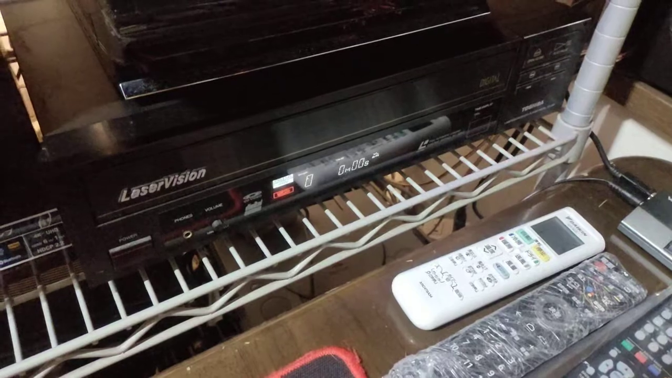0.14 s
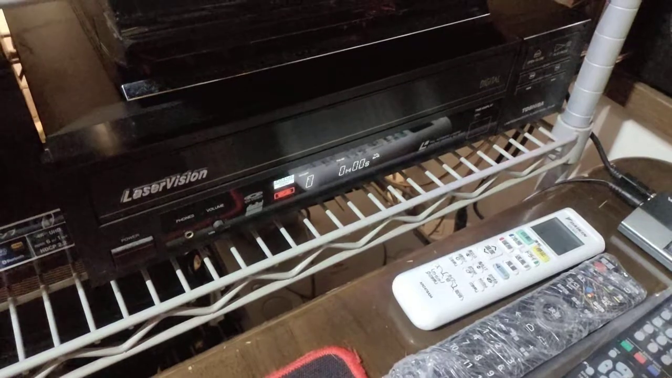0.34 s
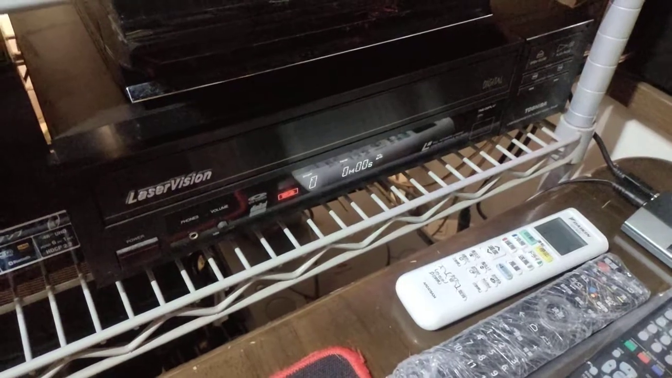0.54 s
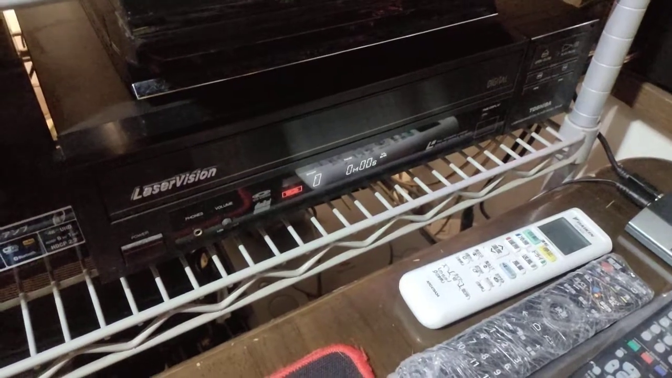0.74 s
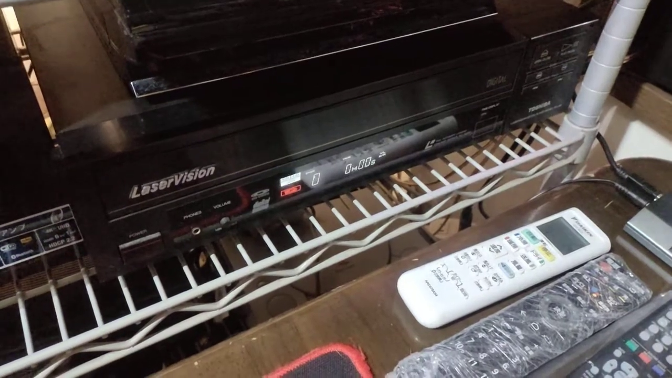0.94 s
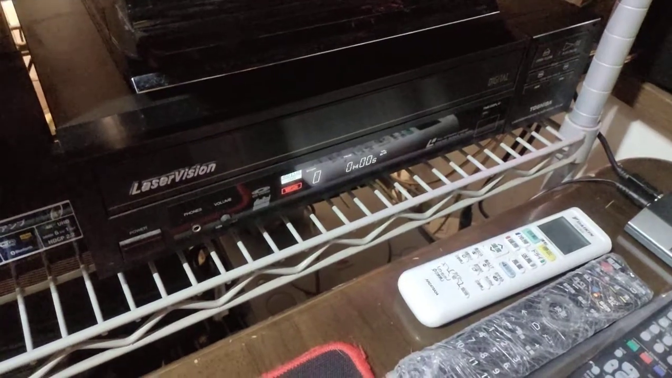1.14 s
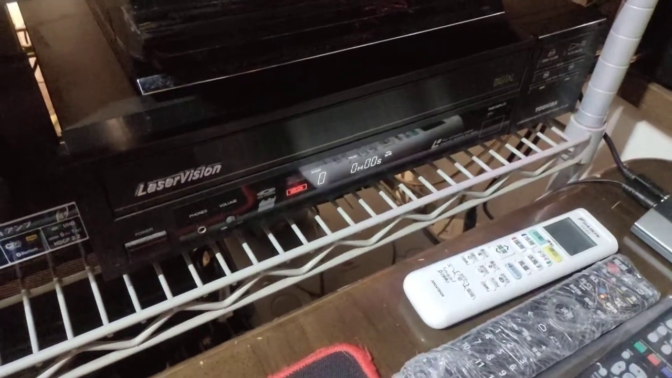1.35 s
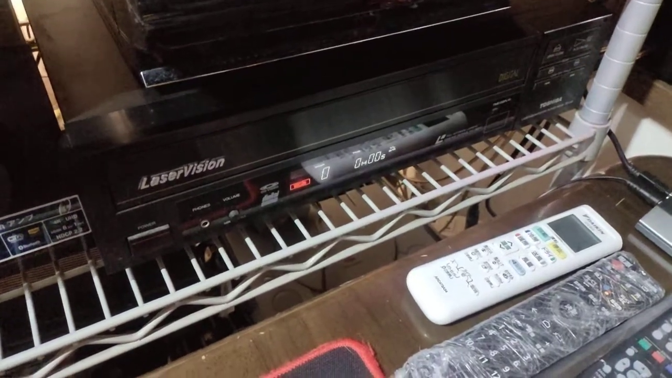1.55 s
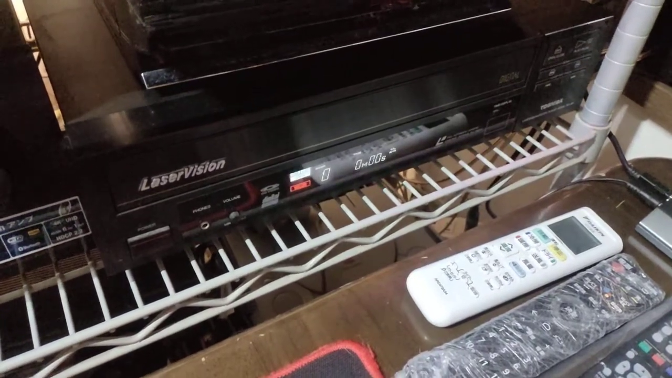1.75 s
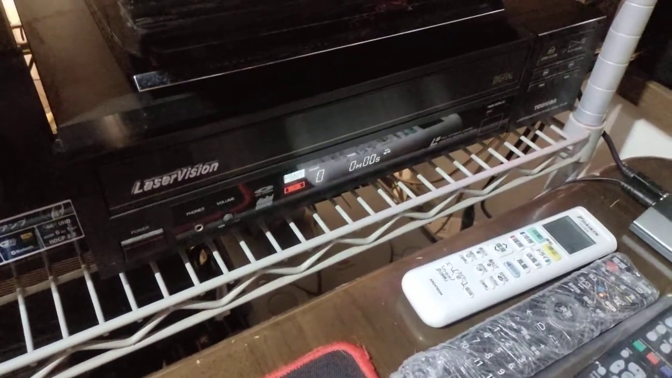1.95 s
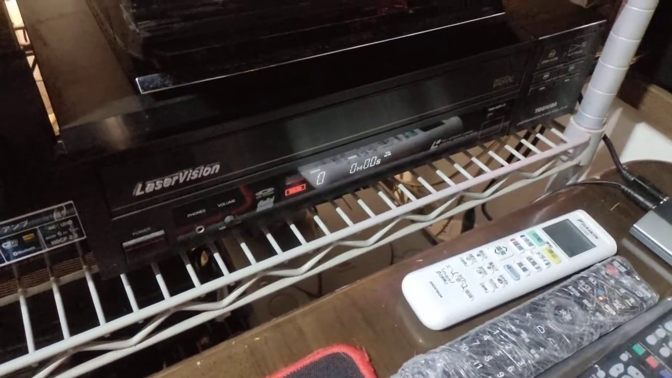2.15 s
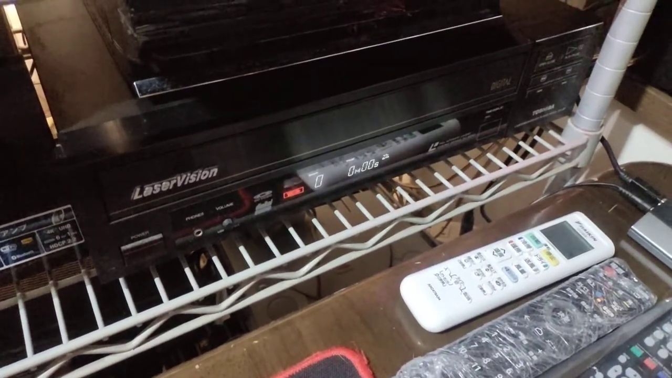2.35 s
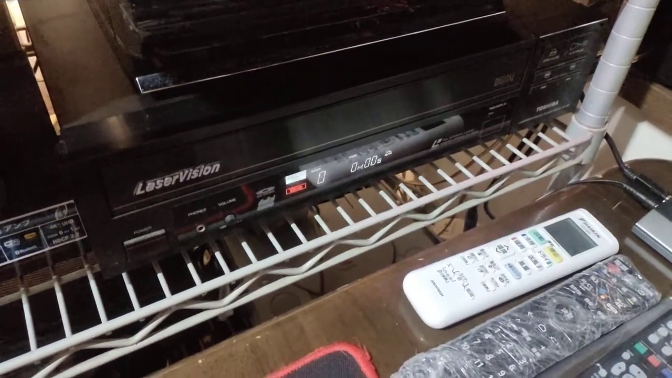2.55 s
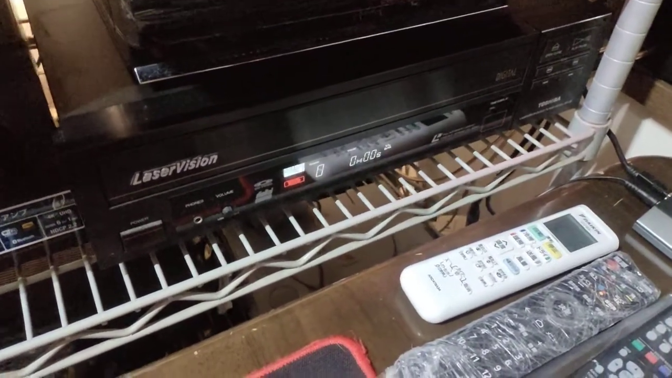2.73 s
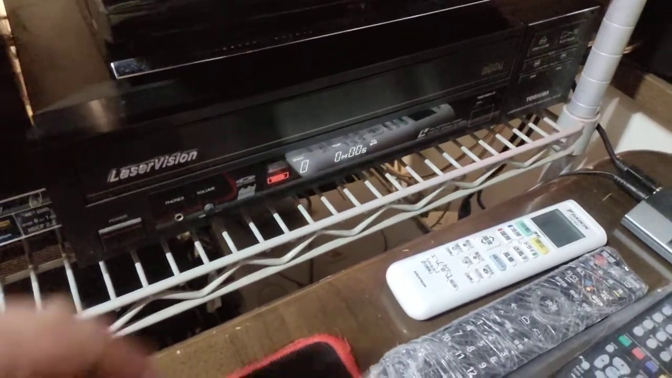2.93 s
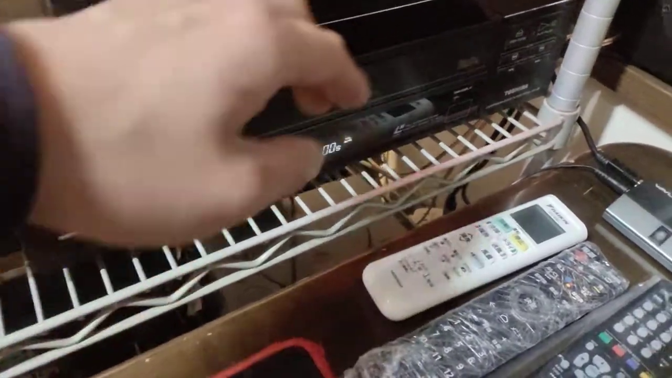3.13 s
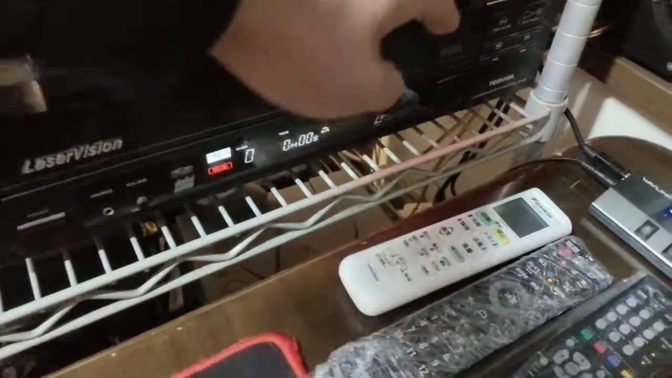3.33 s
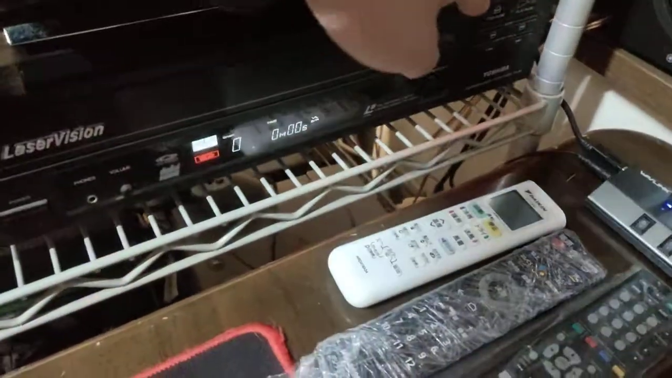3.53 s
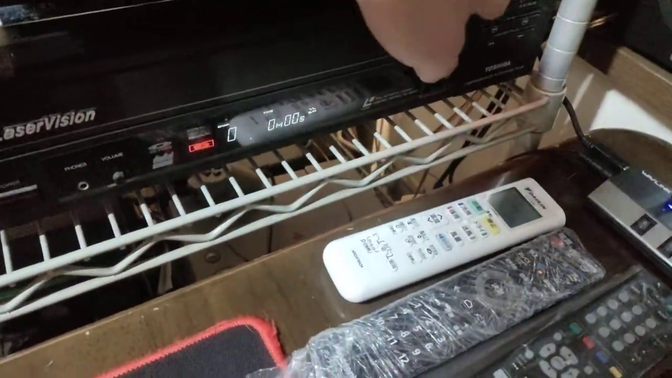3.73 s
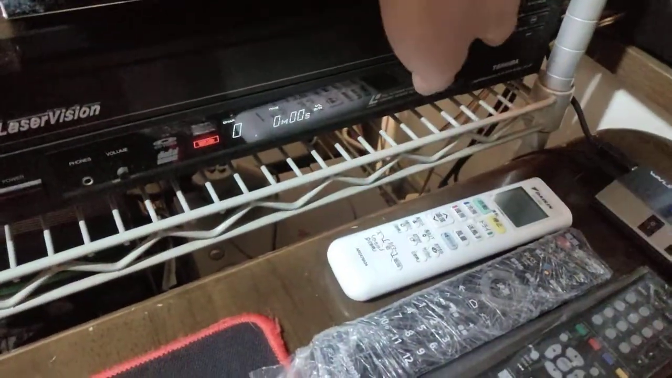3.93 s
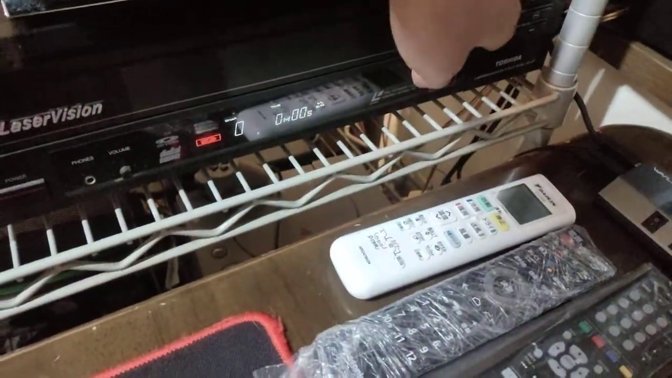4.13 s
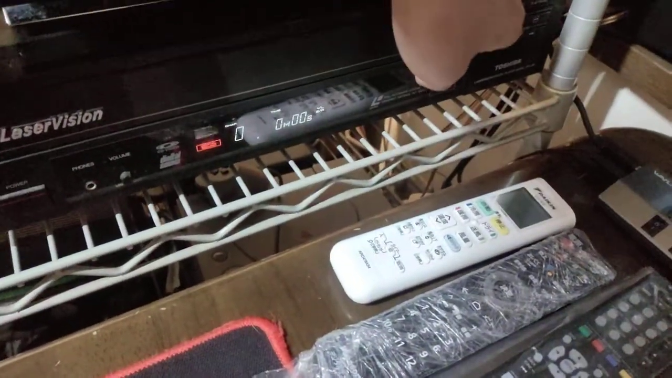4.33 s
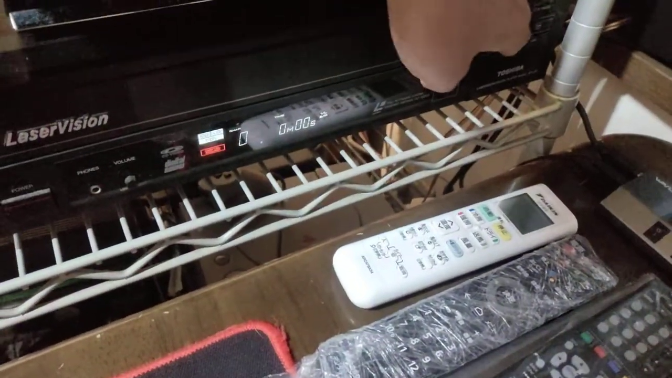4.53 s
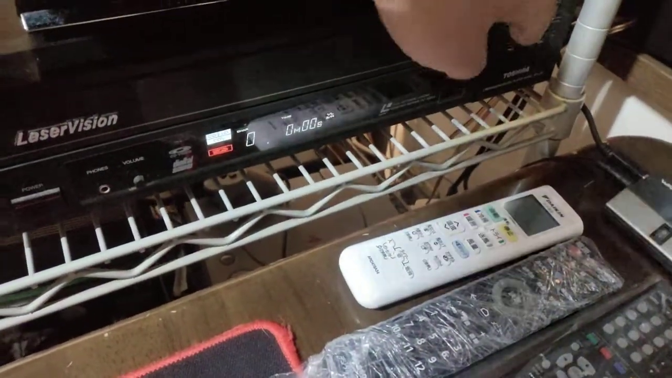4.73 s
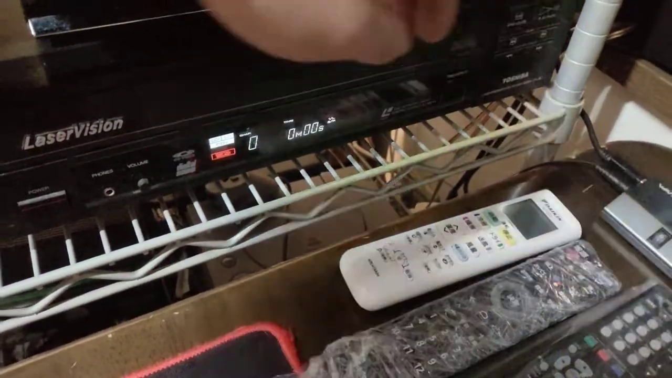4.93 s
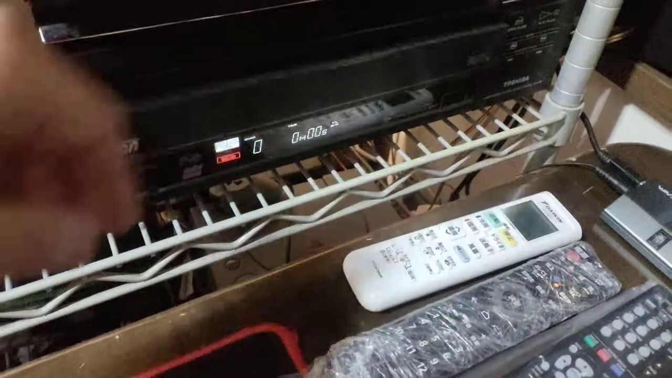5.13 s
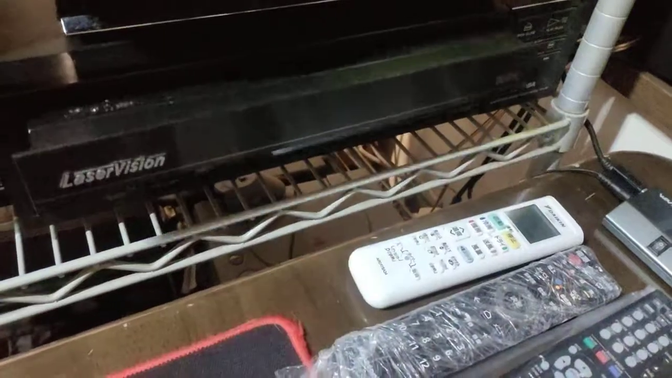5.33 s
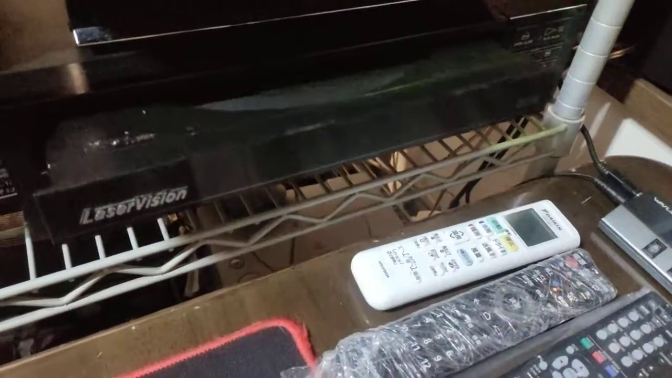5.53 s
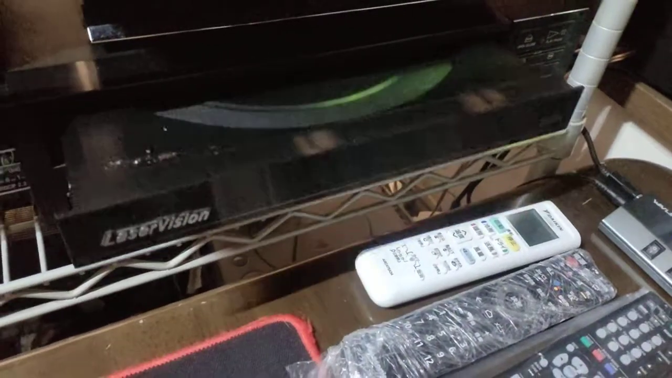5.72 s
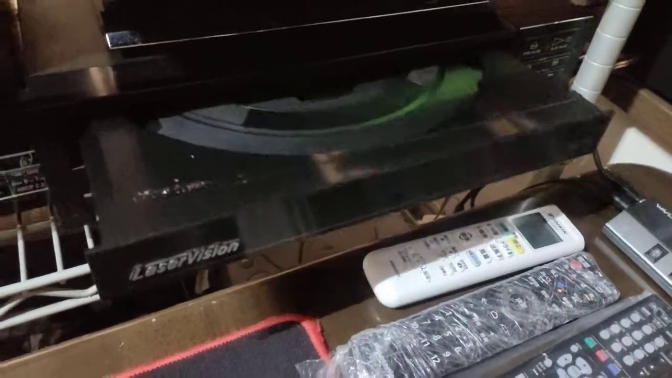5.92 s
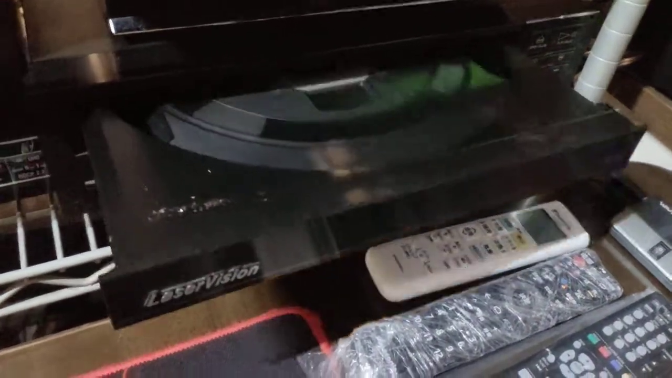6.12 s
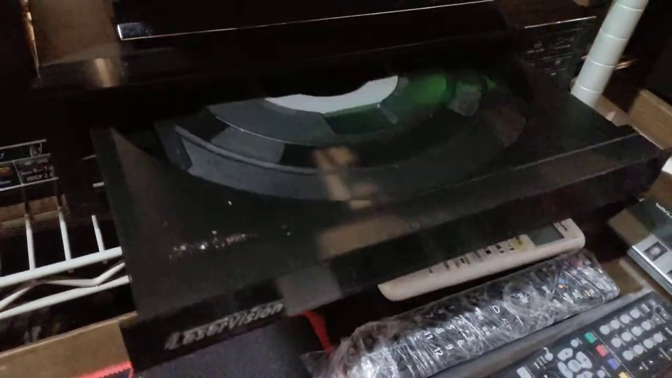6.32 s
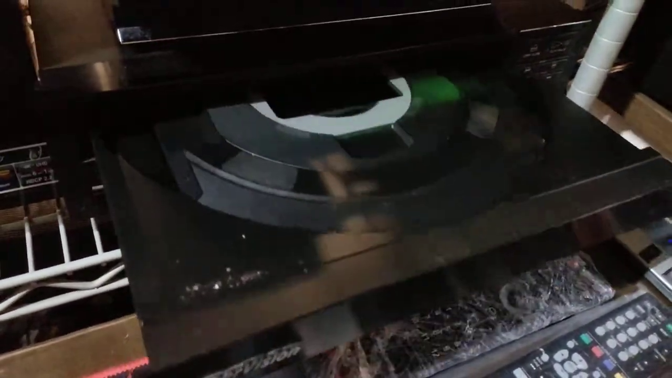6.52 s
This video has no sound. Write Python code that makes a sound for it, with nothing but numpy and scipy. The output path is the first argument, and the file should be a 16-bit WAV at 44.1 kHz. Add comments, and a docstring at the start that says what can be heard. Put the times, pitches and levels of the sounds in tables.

```python
"""A small motor whines, cams clatter twice, a finger clicks a button, the cams run again and a geared tray whirs out.
It is a disc player on a wire shelf in a quiet room; a sleeve rustles, the treble hisses and a low hum wavers.
Cams and latches excite chassis resonances by drag and impact; the motor is a sum of commutator orders.
Gear teeth grind into the tray's resonances; rustle and room tone are coloured noise at two listening ports."""
import sys
import numpy as np
from scipy import signal
from scipy.fft import rfft, irfft, next_fast_len
from scipy.io import wavfile

SR = 44100
rng = np.random.default_rng(int(sys.argv[2]) if len(sys.argv) > 2 else 0)


def wav_out(sig):
    """Save sig, one row per channel (or a flat mono array), as 16-bit PCM at SR to the path in sys.argv[1]."""
    wavfile.write(sys.argv[1], SR, np.round(np.clip(np.atleast_2d(sig).T, -1, 1) * 32767).astype(np.int16))


N = 289737  # samples
FAST = next_fast_len(N)  # transform length

# tray drive, relative levels: start_s, whir_db, gear_whine_db
TRAY_DRIVE = [(5.15, -61, -62), (5.2, -57.5, -62), (5.36, -53, -60), (5.52, -52, -57), (5.71, -52, -55.5),
              (5.85, -49.5, -57.5), (6.07, -52, -54), (6.52, -51.5, -55.5), (6.57, -52.5, -59.5)]


def mechanism():
    """Forced and struck vibration: drag and blows shake one chassis by register; struck parts ring in their modes."""
    # cam runs, and the finger on the front panel, dragging through the chassis; times sorted before use:
    # start_s, full_s, ease_s, over_s, rattle_db, case_boom_db, metal_sizzle_db (relative)
    drags = [(1.13, 1.206, 1.254, 1.27, -44.5, -45.5, -60), (1.253, 1.286, 1.397, 1.577, -44.5, -42.5, -55),
             (1.688, 1.91, 1.9, 1.88, -53, -58, -68.5), (1.887, 1.94, 2.082, 2.13, -44.5, -46, -59),
             (4.13, 4.17, 4.26, 4.23, -65, -62, -81), (4.265, 4.303, 4.305, 4.38, -55.5, -56, -69),
             (4.538, 4.578, 4.822, 4.985, -46.5, -47.5, -60), (4.846, 4.96, 5.1, 5.156, -49.5, -49, -64),
             (5.103, 5.153, 5.28, 5.33, -54, -51, -68)]
    # cams, latches and the panel striking, relative levels:
    # start_s, clack_db, boom_db, sizzle_db, snap_db, struck_note_hz, note_db, ring_t60_s
    blows = [(0.938, -49, -68, -74, -80, 2080, -54, 0.049), (1.163, -34, -59, -60, -70, 1067, -31.5, 0.044),
             (1.213, -31.5, -50, -42.5, -62, 1970, -39, 0.066),
             (1.226, -41, -56, -43, -60, 559, -28, 0.062), (1.287, -38, -46, -64, -70, 628, -28, .055),
             (1.299, -43, -50, -53, -65, 665, -27, 0.077), (1.323, -31, -57, -41, -60, 1051, -17, 0.056),
             (1.345, -42, -32.5, -38.5, -57, 660, -46, 0.054),
             (1.375, -29.5, -41, -40, -46, 686, -41, 0.094), (1.407, -29, -45, -42.5, -64, 622, -27, 0.084),
             (1.428, -30, -42, -53, -66, 574, -25, 0.074), (1.733, -50, -61, -67, -75, 590.4, -31, 0.042),
             (1.777, -45, -56, -61, -70, 1070, -43, 0.037), (1.863, -49, -67, -68, -68, 985, -46, .045),
             (1.91, -31.5, -53, -41, -62, 603, -34, 0.047), (1.93, -48, -33.5, -56, -62, 552, -36, 0.056),
             (1.942, -28.5, -32, -37, -47, 584, -26, 0.07), (1.961, -39, -38, -49, -64, 586, -33, 0.056),
             (1.988, -33.5, -52, -42, -62, 765, -20.5, 0.056), (2.053, -49, -62, -66, -67, 537, -50, 0.035),
             (2.13, -47, -53, -77, -76, 655, -43.5, 0.17), (4.168, -67, -55.5, -78, -84, 650, -62, 0.037),
             (4.302, -58, -52.5, -72, -80, 690, -56, .05), (4.557, -52, -55, -79, -75, 683, -52, .045),
             (4.59, -36, -46, -51, -70, 680, -48, 0.069), (4.62, -38, -58, -43, -68, 1130, -40, 0.081),
             (4.681, -39, -51, -66, -72, 688, -38, 0.09), (4.72, -34, -44, -45, -50, 1090, -26.5, 0.075),
             (4.738, -40, -29, -39.5, -48, 640, -44, 0.062), (4.78, -30.5, -42, -42, -45, 672, -42, 0.072),
             (4.802, -26, -44, -44.5, -62, 743, -26, 0.062),
             (4.818, -34.5, -40.5, -49.5, -68, 790, -38, 0.13), (5.038, -39, -45, -45, -52, 537, -45, .025),
             (5.054, -21.5, -39, -29.5, -32, 634, -46, 0.061),
             (5.084, -26.5, -36, -35, -49, 620, -36, 0.061), (5.11, -43, -46, -50.5, -60, 555, -42, 0.081)]
    # chassis response: frequency_hz, density_db (per Hz)
    chassis = [(24, -54), (40, -46), (133, -10), (274, -4), (352, -8.5), (783, -1.5), (909, -11.5),
               (1110, -5), (1390, -5), (2130, -1.5), (3780, -18.5), (6390, -39.5), (9770, -36),
               (14600, -22.5), (15700, -29)]
    # chassis resonances: frequency_hz, width_hz, lift_db
    chassis_modes = [(171, 40, 2.5), (269.5, 19.5, 9.5), (541, 26, 5), (780, 25, -12.5), (1110, 60, 4),
                     (2101, 70, 7), (3140, 170, 5), (6630, 1400, 13)]
    # share of the drag in each register, low to high: level_db
    drag_db = [-4.5, -5.5, -10, -0.5, -12.5]
    # chatter of a blow in each register, against its boom, clack, sizzle or snap: level_db
    chatter_db = [-13.0, -15, -13, -12, 2]
    # first impact above the chatter in each register: level_db
    impact_db = [36.0, 22.3, 17, 27.2, 13.6]
    # ring time of each register: multiple of the blow's t60
    lasting = [3, 2.56, 1.85, 1.016, 0.27]
    metal_rings_hz, ring_db, ring_width_hz = [4140, 5130, 5950, 6340, 6780], 5, 356
    note_lift_db, note_width_hz, note_impact_db = 15.5, 24, 15.5  # the impact is above the part's chatter
    blow_rise_s = 0.002
    rebound_s, rebound_db = 0.00963, -2.5  # the case thuds again as it settles on the shelf
    registers_hz = [(30, 357), (450, 1677), (1500, 3340), (4000, 8440), (9000, 17000)]

    t = np.arange(SR // 5) / SR
    notes, strikes = np.zeros((2, N)), np.zeros((5, N))
    drag = np.zeros((5, N))
    for *times, rattle, boom, sizzle in drags:
        drag += from_db([[boom], [rattle], [rattle], [sizzle], [sizzle]]) * stroke(times)
    unsteady_db = [3.5 * drift(26) for register in registers_hz]
    force = drag * from_db(np.array(drag_db)[:, None] + unsteady_db)
    contacts = grit(4000, 2.16)
    # each blow wakes the metal rings unevenly
    uneven_db = 5.2 * rng.standard_normal((len(blows), len(metal_rings_hz)))
    for blow, rings_db in zip(blows, uneven_db):
        start_s, clack_db, boom_db, sizzle_db, snap_db, note_hz, note_db, t60_s = blow
        first = round(start_s * SR)
        span = slice(first, first + len(t))
        strength = from_db(np.add([boom_db, clack_db, clack_db, sizzle_db, snap_db], chatter_db))
        # one clean impact, then chatter that rises quickly and dies away
        strikes[:, first] = strength * from_db(impact_db)
        strikes[0, first + round(rebound_s * SR)] += strikes[0, first] * from_db(rebound_db)
        # low registers last longer
        ring_s = max(t60_s, .005) * np.array(lasting)[:, None]
        fade = from_db(-60 * t / ring_s) * (1 - np.exp(-t / blow_rise_s))
        force[:, span] += strength[:, None] * fade
        chatter = contacts[:, span] * fade[3]
        chatter[0, 0] = from_db(note_impact_db)
        notes[:, span] += from_db(note_db + note_lift_db) * resonate(chatter, note_hz, note_width_hz)
        for hz, db in zip(metal_rings_hz, rings_db):
            notes[:, span] += from_db(sizzle_db + ring_db + db) * resonate(chatter, hz, ring_width_hz)

    # each register is scaled by the chassis's own response there
    unit = colour(rng.standard_normal((1, SR)), chassis, chassis_modes)
    drive = 0
    for push, strike, (low, high) in zip(force, strikes, registers_hz):
        narrowed = band(band(push * contacts + strike, low, high), low * 0.73, high * 1.25)
        drive = drive + narrowed / np.std(band(unit, low, high))
    return notes + colour(drive, chassis, chassis_modes)


def tray():
    """Friction-driven resonance: gear teeth grind into modes that wax and wane; tight spots swell the whir."""
    # broad spectrum of the teeth: frequency_hz, density_db (per Hz)
    tray_colour = [(35, -46), (60, -17), (277, -3), (449, -2.5), (655, 12.5), (825, 3), (935, -1),
                   (1720, -6), (3030, -14.5), (3970, -18), (9000, -45), (11700, -56), (19800, -120)]
    # tray resonances: frequency_hz, width_hz, lift_db
    tray_modes = [(290, 15.5, 4.5), (632, 63, -8.5), (664, 18, -13), (942, 9.7, 10.5), (1120, 20, 3.5),
                  (1246, 17, 5.5), (1500, 40, 5), (1580, 27, 11), (1844, 32, 4.5), (2230, 28, 6.5),
                  (3004, 310, 10.5), (3230, 110, -7), (3430, 60, 8), (4300, 210, 5)]
    # tight spots of the rack passing the pinion: centre_s, level_db
    bumps = [(5.288, -56), (5.395, -48), (5.493, -47.5), (5.54, -56), (5.588, -50), (5.684, -56),
             (6.047, -55), (6.099, -58.5), (6.21, -47), (6.308, -50.5)]
    bump_s = 0.0057  # Gaussian width
    drone_db, whir_lift_db, whine_lift_db = -4.5, 2, 5.5  # against the drive

    whir_db, whine_db = in_time(TRAY_DRIVE)
    t = np.arange(N) / SR
    swell = sum(from_db(db) * np.exp(-.5 * ((t - s) / bump_s) ** 2) for s, db in bumps)
    teeth = colour(grit(2500, 1.8), tray_colour)
    grind = teeth.copy()
    for hz, width, lift_db in tray_modes:
        waxing_db = 4.1 * drift(5.9) * min(1, 40 / width)  # broad modes vary less
        grind += from_db(lift_db + waxing_db) * resonate(teeth, hz, width)
    whir_gain = from_db(whir_db + whir_lift_db + 1.3 * drift(51)) + swell
    whir = whir_gain * rms_one(band(grind, 905, 8200))
    drone = from_db(whir_db + drone_db + 0.78 * drift(6.7)) * rms_one(band(grind, 85, 318))
    whine = from_db(whine_db + whine_lift_db) * rms_one(band(grind, 467, 800))
    return drone + whine + whir


def gear_tones():
    """Gear-mesh tones: thin sines, each wavering in pitch and waxing on its own as the tray travels."""
    # mesh tones: pitch_hz, level_db (against the whir, at the tray's start), climb_db_per_s
    mesh = [(656, -17.5, 5), (961, -16, 3.0), (1130, -12.5, -1), (1490, -1, -2)]
    wax_db, wax_rate_hz = 3.5, 3.1

    travelled_s = np.arange(N) / SR - TRAY_DRIVE[0][0]
    tones = 0
    for hz, db, climb_db_per_s in mesh:
        gain = from_db(db + climb_db_per_s * travelled_s + wax_db * drift(wax_rate_hz))
        wavering_hz = hz * (1 + 0.00401 * drift(9.98))
        tones = tones + gain * np.sin(2 * np.pi * np.cumsum(wavering_hz) / SR)
    return from_db(in_time(TRAY_DRIVE)[0]) * tones * [[1], [0]]


def button():
    """Modal impact: each snap rings switch body, cap, spring and panel, every mode struck anew."""
    # button snaps, relative levels: start_s, switch_db, cap_db, spring_db, panel_thud_db
    snaps = [(3.85, -58, -85, -60, -64), (3.942, -59, -63, -64, -64), (4.1268, -35.5, -50, -45, -67),
             (4.272, -65, -70, -63, -58), (4.2955, -46, -47, -61, -61)]
    # modes of each part: frequency_hz, level_db, t60_s
    switch_modes = [(2920, 2.5, 0.015), (3360, -5, 0.01), (4100, -7, .006)]
    cap_modes = [(1820, 10.5, 0.018), (2210, 10, 0.0082)]
    spring_modes = [(4930, 2.5, 0.0055), (5300, -3, 0.0055), (6460, 3, 0.0059), (7530, 6.5, 0.0066),
                    (9400, -17, .003), (13000, -6, .003)]
    panel_modes = [(272, -7, 0.053), (667, 6, 0.11), (1100, -15, .03)]

    rows, out = np.array(snaps), np.zeros((2, N))
    at = np.round(rows[:, 0] * SR).astype(int)
    for column, modes in enumerate([switch_modes, cap_modes, spring_modes, panel_modes], 1):
        for hz, db, t60_s in modes:
            clicks = np.full((2, N), 1e-18)
            # the contact bounces: delay in samples, level in dB
            for after, bounce_db in (0, 0), (55, 0.5), (130, -2.0):
                signs = rng.choice([-1, 1], (len(at), 2)).T
                clicks[:, at + after] = from_db(rows[:, column] + db - 7.5 + bounce_db) * signs
            r, w = from_db(-60 / (t60_s * SR)), 2 * np.pi * hz / SR
            out += signal.lfilter([0, np.sin(w)], [1, -2 * r * np.cos(w), r * r], clicks)
    return out


def motor():
    """Commutator harmonics on a slightly wavering speed, over resonant brush noise."""
    # commutator orders: multiple, level_db (relative)
    orders = [(1, -8), (2, -0.5), (5, -33.5), (8, -26)]
    # brush resonances: frequency_hz, width_hz, lift_db
    brush_modes = [(646, 144, 15.5), (1180, 290, 9), (2360, 420, 12.5), (6400, 540, 8.5)]
    # brush spectrum: frequency_hz, density_db (per Hz)
    brush_colour = [(100, -13), (500, 0.5), (3000, -12), (9000, -19.5)]
    # commutator pitch; after switch-off it sags and fades
    running_hz, off_s, sag_hz_per_s, coast_db_per_s = 296.4, .935, 55, 124
    tone_db, brush_db, brush_coast_db_per_s = -64, -66.5, 220
    # upper tones fade as it runs
    fourth_db, fourth_fade_db_per_s = -65.5, 20
    sideband_order, sideband_db, sideband_fade_db_per_s = 3.84, -71, 8

    t = np.arange(N) / SR
    coasting_s = np.maximum(t - off_s, 0)
    pitch_hz = running_hz - sag_hz_per_s * np.minimum(coasting_s, 1)
    phase = 2 * np.pi * np.cumsum(pitch_hz * (1 + 0.0014 * drift(6.4))) / SR
    tone = sum(from_db(tone_db + db + 1.0 * drift(5.3)) * np.sin(k * phase) for k, db in orders)
    brushes = rms_one(colour(rng.standard_normal((2, N)), brush_colour, brush_modes))
    fourth = from_db(fourth_db - fourth_fade_db_per_s * t) * np.sin(4 * phase)
    sideband = from_db(sideband_db - sideband_fade_db_per_s * t) * np.sin(sideband_order * phase)
    tones = from_db(-coast_db_per_s * coasting_s) * (tone + fourth + sideband) * [[1], [0]]
    return tones + from_db(brush_db - brush_coast_db_per_s * coasting_s) * brushes


def rustle():
    """Friction noise: dense fine contacts hiss, unrelated at the two ports."""
    # cloth and sliding hiss; times sorted before use:
    # start_s, full_s, ease_s, over_s, level_db, left_right_db
    rubs = [(2.94, 3.217, 3.1, 5.5, -65.5, -2.5), (3.8, 3.87, 4.2, 4.56, -76.5, -2),
            (5.13, 5.154, 6.2, 6.6, -65, -2), (5.782, 5.776, 5.77, 5.92, -46, -1),
            (5.862, 5.89, 5.96, 6.22, -66.5, -5), (6.12, 6.4, 6.42, 6.78, -56, -2)]
    # hiss spectrum: frequency_hz, density_db (per Hz)
    hiss_colour = [(880, -26), (1500, -15.5), (1720, -12), (3100, -11.5), (3600, -9), (4010, -15),
                   (7440, -13.5), (9990, -21.5), (13500, -15.5), (15700, -21.5)]

    level = 0
    for *times, db, pan_db in rubs:
        level = level + from_db(db + pan_db * np.array([[.5], [-.5]])) * stroke(times)
    hiss = rms_one(colour(grit(12000, 2.6), hiss_colour))
    return level * from_db(0.81 * drift(31)) * hiss


def room():
    """Partly coherent noise, most alike in the bass, with thin steady tones and a wavering hum."""
    # room spectrum: frequency_hz, density_db (per Hz, relative)
    room_tone = [(15, -71), (25, -24), (53, -35), (75, -13.5), (156, -1), (241, -5), (380, -10.5),
                 (435, -12.5), (618, -7.5), (854, -13), (926, -13.5), (1180, -13.5), (1460, -14),
                 (2510, -19), (9000, -30.5), (15700, -31)]
    # room level: time_s, level_db
    room_level = [(0.0, -62), (6.57, -60)]
    # left-right correlation: frequency_hz, likeness
    likeness = [(60, 0.72), (180, 0.81), (550, 0.48), (1650, 0.13), (4970, -0.3), (15000, 0.089)]
    # left-right balance: frequency_hz, left_right_db
    room_balance = [(60, -0.5), (180, 1.5), (550, -1), (1650, 4), (4970, -2), (15000, 1.5)]
    # steady tones: pitch_hz, level_db (nominal rms)
    steady_tones = [(646, -78), (904, -82), (970, -79)]
    # hum level: time_s, level_db (rms)
    hum_level = [(3.8, -83), (4.6, -73), (4.94, -62), (5.36, -81), (5.64, -66.5), (5.8, -79), (6.0, -85),
                 (6.12, -70), (6.3, -71.5), (6.57, -89)]
    hum_start_hz, hum_climb_hz_per_s = 76.5, 6.3  # pitch where it sets in, and its climb

    hz, t = np.fft.rfftfreq(FAST, 1 / SR), np.arange(N) / SR
    mid, side = rfft(rng.standard_normal((2, FAST))) * from_db(at_hz(room_tone, hz))
    alike = np.clip(at_hz(likeness, hz), -1, 1)
    half = from_db(at_hz(room_balance, hz) / 2)
    pair = np.sqrt(1 + alike) * mid + np.sqrt(1 - alike) * side * [[1], [-1]]
    air = irfft(pair * [half, 1 / half], FAST)[:, :N]
    tones = 0
    for tone_hz, db in steady_tones:
        tones = tones + np.sqrt(2) * from_db(db + 1.0 * drift(0.33)) * np.sin(2 * np.pi * tone_hz * t)
    hum_hz = hum_start_hz + hum_climb_hz_per_s * (t - hum_level[0][0])
    hum_gain = np.sqrt(2) * from_db(in_time(hum_level)[0])
    hum = hum_gain * np.sin(2 * np.pi * np.cumsum(hum_hz) / SR)
    return from_db(in_time(room_level)[0]) * rms_one(air) + tones + hum


def at_ports(pair, balance):
    """Interaural-style delay and decorrelation: the left is late in the treble; a second stream parts the ports."""
    left_lag_s, lag_from_hz = 0.000371, 1190
    own_from_hz, own_db = 900, -4
    echo_low_hz, echo_t60_s, echo_db = 500, .12, -17

    hz = np.fft.rfftfreq(FAST, 1 / SR)
    shared, own = rfft(pair, FAST)
    # the second stream comes from other panels
    own = own * from_db(own_db) / np.sqrt(1 + (own_from_hz / (hz + 1)) ** 2)
    late = np.exp(-2j * np.pi * left_lag_s * hz / (1 + (lag_from_hz / (hz + 1)) ** 4))
    # shelf and walls return a short diffuse tail
    t = np.arange(SR // 5) / SR
    echo = rng.standard_normal((2, len(t))) * from_db(-60 * t / echo_t60_s) * (t > .002)
    echo = echo / np.sqrt(np.sum(echo ** 2) / 2)
    echo = signal.sosfilt(signal.butter(1, echo_low_hz, "high", fs=SR, output="sos"), echo)
    wet = shared * rfft(echo, FAST) * from_db(echo_db)
    direct = np.array([(shared + own) * late, shared - own])
    half = from_db(at_hz(balance, hz) / 2)
    return irfft((direct + wet) * [half, 1 / half], FAST)[:, :N]


def grit(per_s, uneven_db):
    """Random impulse train: two unrelated streams of dense contacts of uneven size; rms 1."""
    sizes = from_db(uneven_db * np.minimum(rng.exponential(1, (2, N)), 4))
    signed = sizes * rng.choice([-1, 1], (2, N))
    return rms_one(signed * (rng.random((2, N)) < per_s / SR))


def resonate(x, hz, width):
    """Two-pole resonance, gain 1 on top."""
    r = np.exp(-np.pi * width / SR)
    poles = [1, -2 * r * np.cos(2 * np.pi * hz / SR), r * r]
    return signal.lfilter((1 - r * r) / 2 * np.array([1, 0, -1]), poles, x)


def colour(x, spectrum, modes=()):
    """Causal (minimum-phase) filter by the cepstrum: a broad spectrum lifted at each resonance."""
    hz = np.fft.rfftfreq(8192, 1 / SR)
    db = at_hz(spectrum, hz)
    for f, width, lift_db in modes:
        db = db + lift_db / (1 + (2 * (hz - f) / width) ** 2)
    cepstrum = irfft(db * np.log(10) / 20)
    # fold the negative-time half onto the positive
    cepstrum[1:4096] *= 2
    cepstrum[4097:] = 0
    response = irfft(np.exp(rfft(cepstrum)))
    return signal.fftconvolve(x, response[None], axes=1)[:, :N]


def band(x, low_hz, high_hz):
    """Butterworth band-pass."""
    return signal.sosfilt(signal.butter(2, [low_hz, high_hz], "band", fs=SR, output="sos"), x)


def drift(rate):
    """Low-passed noise: slow chance of spread 1, drawn at every 32nd sample and run in."""
    r = np.exp(-64 * np.pi * rate / SR)
    draws = rng.standard_normal(N // 32 + 1502)
    slow = signal.lfilter([1], [1, -2 * r, r * r], draws)[1500:]
    return np.interp(np.arange(N) / 32, np.arange(len(slow)), rms_one(slow))


def stroke(times):
    """Envelope that rises, holds and falls at four sorted times in s."""
    ramp = np.interp(np.arange(N) / SR, np.sort(times), [0, 1, 1, 0])
    return ramp ** 1.37  # above 1, starts and ends taper softly


def in_time(table):
    """Linear interpolation of each level column; silent (-150 dB) outside the table's span."""
    t, columns = np.arange(N) / SR, np.transpose(table)
    return [np.interp(t, columns[0], levels, -150, -150) for levels in columns[1:]]


def at_hz(points, hz):
    """A spectrum table read on a log-frequency axis."""
    table = np.array(points)
    return np.interp(np.log(hz + 1), np.log(table[:, 0]), table[:, 1])


def from_db(db):
    """Amplitude gain of a level in dB."""
    return 10 ** (np.asarray(db) / 20)


def rms_one(x):
    """Power normalisation: scaled to rms 1."""
    return x / np.sqrt(np.mean(x ** 2) + 1e-20)


def scene():
    """Superposition: the player heard through both ports, over rustle and room."""
    # left-right balance of chassis and of tray: frequency_hz, left_right_db
    chassis_balance = [(60, 3), (99, -1), (160, 0), (270, -0.5), (450, -2.5), (740, 1.5), (1220, -0.5),
                       (2010, 2.5), (3330, 3.5), (5500, -14.5), (9080, -3.5), (15000, -5)]
    tray_balance = [(60, -3), (110, 2), (200, 0.5), (380, 0.5), (700, 0), (1290, -2.5), (2380, 9.5),
                    (4400, -4.5), (8120, -39), (15000, 36)]
    player = at_ports(mechanism() + button() + motor(), chassis_balance)
    moving_tray = at_ports(tray() + gear_tones(), tray_balance)
    return player + moving_tray + rustle() + room()


def record(dry):
    """Elliptic low-pass: the top is cut above 15750 Hz."""
    return signal.sosfilt(signal.ellip(12, .3, 60, 15750, fs=SR, output="sos"), dry)


dry = scene()
out = record(dry)
wav_out(out)
```